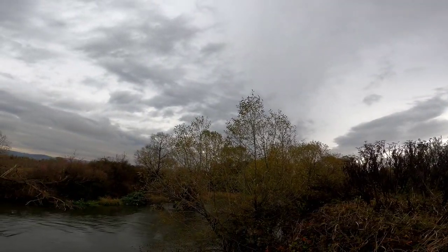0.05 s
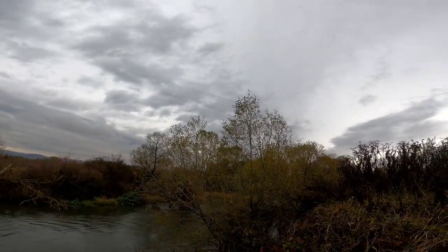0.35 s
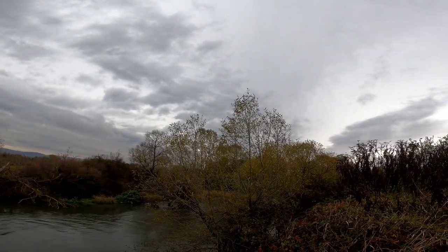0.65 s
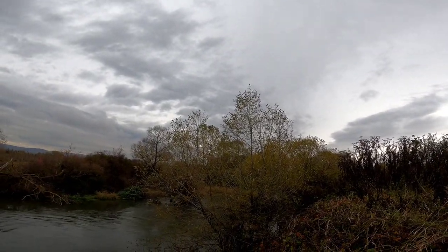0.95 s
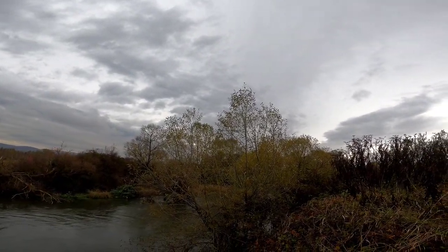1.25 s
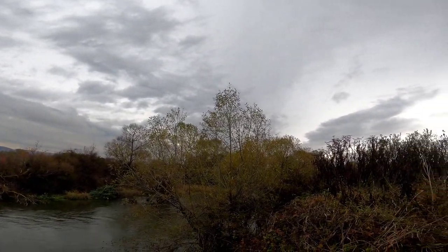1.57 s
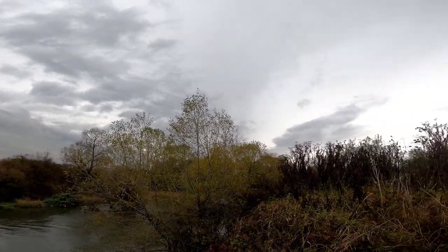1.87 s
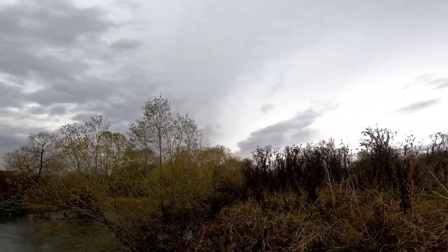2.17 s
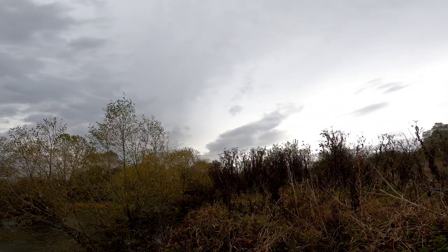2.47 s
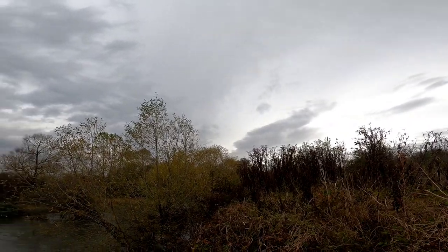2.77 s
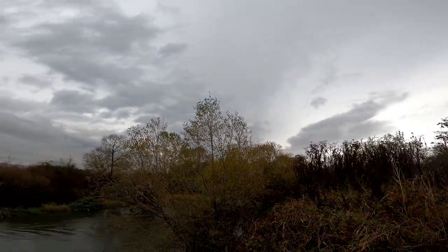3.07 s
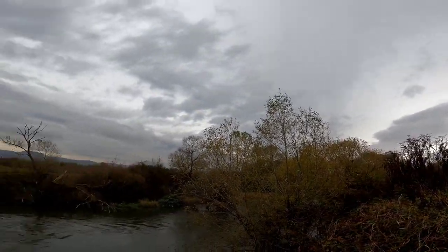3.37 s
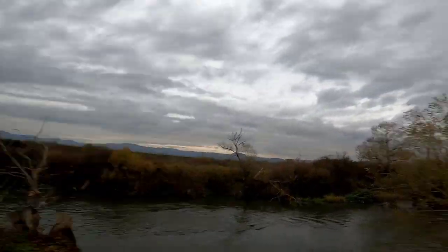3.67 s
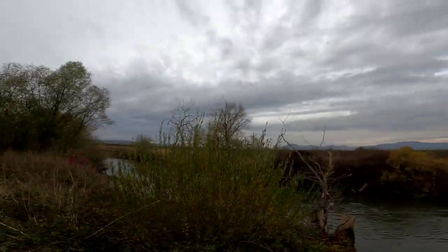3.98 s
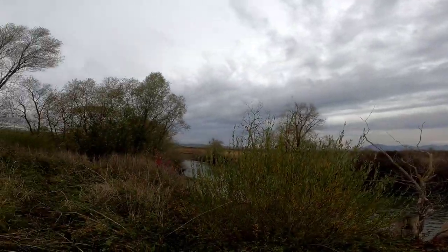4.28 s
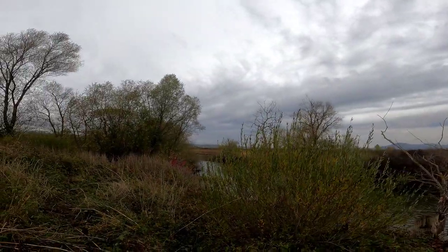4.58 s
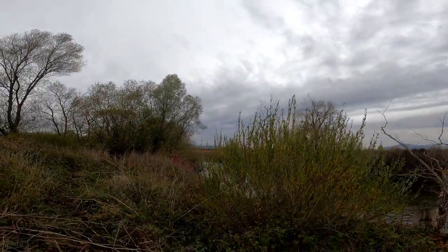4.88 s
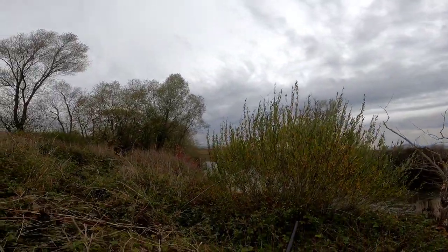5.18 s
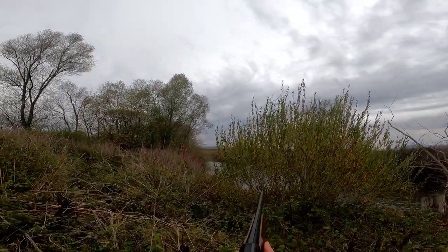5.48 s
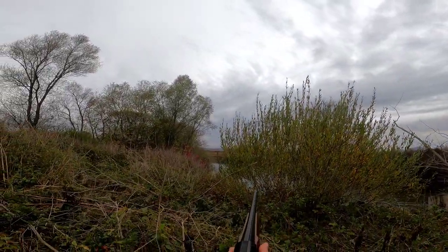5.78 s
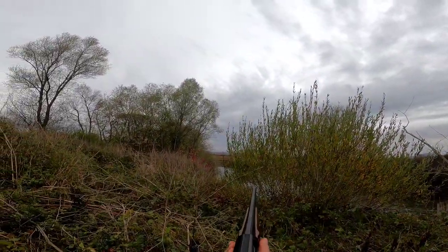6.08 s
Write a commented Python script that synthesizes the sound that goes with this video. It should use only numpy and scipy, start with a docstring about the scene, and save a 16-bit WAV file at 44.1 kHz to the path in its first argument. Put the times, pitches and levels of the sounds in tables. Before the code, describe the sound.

A river rushes softly under wind rumble and faint birds, then one loud, close shotgun blast echoes away, followed by metallic gun clicks and rustling.

```python
"""A shotgun fired close by on a river bank, heard from a body-worn microphone on a grey, breezy day.
The blast overloads the recorder, slaps back off the far bank and rolls away through the trees.
Under it the river splashes and bubbles, wind eddies rumble on the microphone and small birds twitter
in the bushes. Right at the microphone the wearer shifts in dry weeds and brings up a gun:
cloth rubs, stems snap, and a steel latch and catch click."""
import sys
import numpy as np
from scipy import signal
from scipy.fft import rfft, irfft
from scipy.io import wavfile

SR = 44100
rng = np.random.default_rng(int(sys.argv[2]) if len(sys.argv) > 2 else 0)


def to_wav(s):
    """Save 16-bit WAV."""
    ch = np.atleast_2d(s).T  # columns
    pcm = np.round(np.clip(ch, -1, 1) * 32767)  # PCM
    wavfile.write(sys.argv[1], SR, pcm.astype(np.int16))


N = 275184
TIME = np.arange(N) / SR
FREQS = np.maximum(np.arange(N // 2 + 1) * SR / N, 1)

# how alike the channels are for open air, gunshot and close sounds: (frequency [Hz], likeness [0-1])
AIR_LIKENESS = [(60, 0.1), (300, 0.73), (700, 0.85), (1400, 0.57), (3000, 0.31), (8000, 0.76)]
ROLL_LIKENESS = [(100, 0.96), (300, 1), (700, 0.86), (1400, 0.59), (3000, 0.4), (7000, 0.58)]
NEAR_LIKENESS = [(200, 0.99), (2000, 0.69), (10000, 0.47)]
# where the same three sit in the stereo image: (frequency [Hz], left over right [dB])
AIR_BALANCE = [(100, -0.5), (700, 0.5), (1300, 2), (4400, 0.5), (8000, 5), (15000, -1)]
ROLL_BALANCE = [(100, -0.5), (1300, 2.5), (4400, -1.5), (15000, 2.5)]
NEAR_BALANCE = [(200, 2), (1300, 17), (4400, 1.5), (15000, 8.5)]

# the river from the bank, fainter once the wearer turns away: (time [s], level [dB])
RIVER_LEVEL = [(0, -52.5), (1.9, -52), (2.5, -50.5), (2.7, -54), (5.6, -54.5), (6.1, -57.5)]
# the rush of the current: (frequency [Hz], level [dB])
RIVER_SPECTRUM = [(130, -4.5), (200, -1.5), (380, -3), (560, 1.5), (790, -4), (920, 3), (1300, -0.5),
                  (1900, -4.5), (2700, -10.5), (4500, -16), (7000, -21), (9700, -39), (12000, -71),
                  (15000, -67)]
# bubbles that stand out of the current: (time [s], start pitch [Hz], end pitch [Hz], level [dB])
PLOPS = [(0.192, 965, 2590, -52.5), (.388, 1150, 2620, -51), (2.581, 1330, 1930, -45.5),
         (6.021, 930, 1606, -51.5)]

# wind on the microphone, with an early buffet and a gust just before the shot: (time [s], level [dB])
WIND_LEVEL = [(0, -55), (.06, -34.5), (.12, -49.5), (.7, -47.5), (1.8, -42.5), (2.55, -41.5), (3.75, -45),
              (3.88, -36), (4.02, -35.5), (4.09, -48.5), (4.7, -44), (4.9, -37.5), (5.25, -42), (5.75, -42),
              (6.24, -40.5)]
# its rumble: (frequency [Hz], level [dB])
WIND_SPECTRUM = [(18, -20), (32, 1), (48, 1.5), (65, -5), (85, -13), (104, -15.5), (130, -23.5),
                 (200, -34.5), (300, -86)]
WIND_LIKENESS = [(20, .97), (60, .985)]  # (frequency [Hz], likeness [0-1])
WIND_BALANCE = [(20, .2), (100, .6)]  # (frequency [Hz], left over right [dB])

# notes of a song from deep in the bushes: (time [s], level [dB])
SONG_NOTES = [(0.174, -58), (0.227, -51.5), (0.302, -51.5), (0.371, -48), (0.442, -53.5), (0.515, -52),
              (.604, -54.5), (0.712, -63)]
# a bird's faint trills: (time [s], level [dB])
TRILLS = [(0.515, -59), (2.813, -63.5)]
# the tones of one trill note: (pitch [Hz], level [dB], roughness [share of pitch])
TRILL_TONES = [(3850, -1.5, .036), (4450, -3, .036), (5500, -6, .08)]
# high buzzing calls, farther off: (time [s], pitch [Hz], level [dB])
BUZZES = [(.615, 8300, -60.5), (1.33, 7550, -61), (1.945, 7950, -61.5), (2.875, 7600, -56.5),
          (3.597, 7400, -53.5)]
# nearby whistles:
# (time [s], length [s], start pitch [Hz], end pitch [Hz], level [dB], roughness [share of pitch])
WHISTLES = [(1.569, 0.044, 5570, 7400, -57, 0.07), (1.607, 0.049, 4290, 4300, -55, 0.019),
            (2.515, 0.05, 8500, 6750, -61, .013), (2.647, 0.035, 8100, 6100, -56.5, .011),
            (3.107, 0.03, 8950, 8200, -61.5, .013)]
# short harsh scolds nearby: (time [s], length [s], level [dB])
SCOLDS = [(2.765, 0.028, -56), (3.7, 0.018, -49.5), (3.74, 0.019, -46.5), (3.781, 0.016, -53.5)]

# dry stalks snapping close by: (time [s], level [dB], centre [Hz])
SNAPS = [(0.509, -46, 9000), (0.9742, -44, 9000), (1.0044, -50, 11000), (1.222, -48, 4000),
         (1.303, -43, 7560), (1.742, -42.5, 3820), (1.8498, -46, 4000), (1.9077, -47.5, 5000),
         (2.9464, -44, 7500), (3.3952, -46.5, 4550), (4.072, -48, 3500), (4.3628, -30.5, 8100),
         (4.385, -29, 3980), (4.4555, -32, 3570), (5.632, -41, 6200), (5.677, -36, 5970),
         (5.809, -38, 5700), (6.007, -42, 6500), (6.1732, -38.5, 4870)]
# light knocks of the wearer's gear: (time [s], level [dB], centre [Hz], left over right [dB])
GEAR_KNOCKS = [(4.9545, -26.5, 970, 1), (4.9681, -23.5, 12000, 13), (5.427, -34.5, 960, 0),
               (5.5415, -35, 6550, 7)]
# resonances of stalks and gear: (frequency [Hz], level [dB], t60 [s])
CLICK_MODES = [(957, -3, 0.033), (1220, -7.5, 0.006), (1490, 0, 0.0063), (2460, 3, 0.0039),
               (3470, 2, 0.0048), (5040, 2, 0.0052), (6500, 7, 0.0017), (7400, 6, 0.002),
               (9540, -1, 0.0038), (12300, 5, 0.0014)]
# dead stems crunching under the boots: (time [s], level [dB], half length [s])
CRUNCHES = [(1.0, -56, 0.024), (1.36, -59, 0.16), (1.76, -61.5, 0.39), (3.42, -61, 0.22),
            (4.06, -64, 0.039), (5.7, -54, 0.55)]
# clothes rubbing by the microphone, legs sweeping through weeds: (time [s], level [dB], half length [s])
CLOTH_SCUFFS = [(1.74, -51, 0.018), (2.35, -56.5, 0.43), (2.966, -51.5, 0.058), (3.17, -54, 0.18),
                (3.626, -51, 0.042), (3.716, -47.5, 0.048), (5.21, -39, 0.037), (5.33, -41.5, 0.04),
                (5.542, -47, 0.042), (5.785, -51.5, 0.11), (6.192, -51, 0.042)]
WEED_SWEEPS = [(4.818, -42, 0.027), (4.92, -50.5, 0.2), (5.26, -55, 0.11), (5.525, -52, 0.014),
               (5.68, -57, 0.28), (5.683, -46, 0.028), (5.95, -61, 0.35)]
# dull cloth and crisp weeds: (frequency [Hz], level [dB])
CLOTH_SPECTRUM = [(120, -9), (220, -6.5), (290, 6.5), (400, -7.5), (700, -14), (1000, -17), (1600, -9),
                  (2500, -22.5), (6000, -29), (14000, -70)]
WEED_SPECTRUM = [(530, -19), (900, -5), (1230, -8.5), (2090, -4.5), (3910, -2), (4980, -1), (7580, -2),
                 (11700, -8.5), (14000, -7), (16000, -45)]

# the crack of the shot at close range: (frequency [Hz], level [dB])
CRACK_SPECTRUM = [(400, 19.5), (1200, 22), (1700, -17), (2000, 21.5), (2550, 0), (3000, -21),
                  (5000, -10.5), (9000, -23), (13000, -50)]
# plants that scatter the blast (weeds at hand, far bank, tree line):
# (delay [s], rise [s], fade [dB/s], body level [dB], hiss level [dB])
STANDS = [(.003, 0.0014, 300, -35, -42.5), (0.079, 0.053, 28, -32.5, -46), (0.236, .06, 160, -32, -39.5)]
# the blast as it returns from trunks and from leaves: (frequency [Hz], level [dB])
TRUNK_SPECTRUM = [(41, -27), (70, 0.5), (124, -1), (197, -6), (250, -5), (430, -5.5), (586, -3.5),
                  (740, -5.5), (1100, -3), (1680, -7), (3140, -15), (5000, -29), (6500, -26), (11000, -120)]
LEAF_SPECTRUM = [(1180, -33), (2000, -1.5), (3150, -12), (3430, -2.5), (4770, -3.5), (8890, -13),
                 (12000, -20.5), (15000, -16)]
# distinct echoes off banks and thickets: (time [s], level [dB], low edge [Hz], high edge [Hz])
ECHOES = [(4.21, -29.5, 447, 1300), (4.235, -18.5, 294, 750), (4.2372, -22.5, 1300, 4960),
          (4.244, -13.5, 550, 2180), (4.248, -29, 2430, 2900), (4.309, -24.5, 590, 800),
          (4.317, -35, 654, 1800), (4.468, -27, 660, 1060), (4.499, -37, 860, 1240),
          (4.540, -31, 344, 1700), (4.597, -34, 547, 1520), (4.619, -32, 253, 1110)]
# the dull noise each echo takes its band from: (frequency [Hz], level [dB])
ECHO_SPECTRUM = [(200, 15), (1000, 1), (3000, -13), (7000, -19.5)]

# the gun's latch trips and drops home; a small catch snaps over and rebounds:
# (time [s], level [dB], centre [Hz], left over right [dB])
LATCH_HITS = [(4.7278, -24.5, 7000, 4), (4.7291, -13, 1300, 5.5)]
CATCH_HITS = [(5.2325, -15, 3500, 7.5), (5.2342, -22.5, 8000, 5)]
# the steel ring of each: (frequency [Hz], level [dB], t60 [s])
LATCH_MODES = [(945, -3, 0.048), (1150, -6, .009), (1500, 4, 0.0041), (2480, 1, 0.0073), (3860, -8, .014),
               (4910, 6, .018), (6400, -3, 0.016), (7700, -15, .022), (8700, 3.5, 0.0058)]
CATCH_MODES = [(2470, -13, 0.0053), (3750, 2.5, 0.0034), (5670, 2.5, 0.0033), (7330, -6.5, .017),
               (8400, -18, 0.015)]

STEM_SIDE_DB = 4  # breaking stems sit left of the microphone


def amp(db):
    """Decibels to gain."""
    return 10 ** (np.asarray(db) / 20)


def unit_rms(x):
    """Scale to rms 1."""
    return x / np.sqrt(np.mean(x ** 2) + 1e-20)


def over_time(points):
    """A curve spread over all samples."""
    return np.interp(TIME, *np.transpose(points))


def over_hz(points):
    """A curve spread over all frequencies, on a log scale."""
    hz, value = np.transpose(points)
    return np.interp(np.log(FREQS), np.log(hz), value)


def pan(db):
    """Left and right gains, the left higher by db."""
    return amp(np.array([[db], [-db]]) / 2)


def cut(x, hz, kind, order=2):
    """Causal Butterworth filter."""
    return signal.sosfilt(signal.butter(order, hz, kind, fs=SR, output="sos"), x + 1e-18)


def white():
    """Two unrelated white noises."""
    return rng.standard_normal((2, N))


def drift(rate_hz):
    """A random wander of rms 1, mostly slower than rate_hz."""
    return unit_rms(irfft(rfft(rng.standard_normal(N)) / (1 + (FREQS / rate_hz) ** 2), N))


def grains(per_s, size_db):
    """Random tiny impacts of uneven size, as two unrelated streams."""
    sizes = amp(size_db * np.minimum(rng.exponential(1, (2, N)), 4))
    return unit_rms(sizes * white() * (rng.random(N) < per_s / SR))


def colour(source, spectrum, likeness, balance):
    """Two unrelated streams become one stereo sound with this spectrum; the middle has rms 1."""
    mid, side = rfft(source) * amp(over_hz(spectrum))
    alike = over_hz(likeness)
    sides = np.array([[1], [-1]])
    channels = np.sqrt(1 + alike) * mid + sides * np.sqrt(1 - alike) * side
    out = irfft(channels * amp(sides * over_hz(balance) / 2), N)
    return out / np.std(out.mean(axis=0))


def swells(rows):
    """Gain of rounded strokes that add in power."""
    strokes = (amp(level_db) * np.exp(-((TIME - s) / half) ** 2) for s, level_db, half in rows)
    return np.sqrt(sum(stroke ** 2 for stroke in strokes))


def glide(s, length, start_hz, end_hz, waver, bend=1.314, skew=1):
    """A short rounded sliding tone; more bend delays the slide, a skew under 1 brings the peak forward."""
    out = np.zeros(N)
    at = np.arange(*np.searchsorted(TIME, [s, s + length]))
    progress = (TIME[at] - s) / length
    hz = (start_hz + (end_hz - start_hz) * progress ** bend) * (1 + waver[at])
    out[at] = np.sin(np.pi * progress ** skew) * np.sin(2 * np.pi * np.cumsum(hz) / SR)
    return out


def ring(hits, hz, t60):
    """A unit click sets a sine of height 1 ringing."""
    decay, step = amp(-60 / (t60 * SR)), 2 * np.pi * hz / SR
    return signal.lfilter([0, np.sin(step)], [1, -2 * decay * np.cos(step), decay ** 2], hits + 1e-18)


def strike(contacts, modes, db_per_octave):
    """Each contact rings the modes nearest its own centre most; yields one sound per mode."""
    for hz, mode_db, t60 in modes:
        hits = np.zeros((2, N))
        for s, level_db, centre_hz, side_db in contacts:
            falloff_db = db_per_octave * abs(np.log2(hz / centre_hz))
            hits[:, int(s * SR)] += amp(level_db + mode_db - falloff_db) * pan(side_db)[:, 0]
        yield ring(hits, hz, t60)


def thicket(x, t60, wet_db):
    """Add the diffuse reflections of nearby stems and ground."""
    age = TIME[:SR // 2]
    tail = rng.standard_normal((2, len(age))) * amp(-60 * age / t60)
    tail /= np.sqrt(np.sum(tail ** 2, axis=1, keepdims=True))
    return x + amp(wet_db) * signal.fftconvolve(x, tail, axes=1)[:, :N]


def river():
    """The current from the bank: a rush of countless tiny splashes with bubbles in it."""
    splashes = white() + grains(per_s=2500, size_db=2.5)
    rush = colour(splashes, RIVER_SPECTRUM, AIR_LIKENESS, AIR_BALANCE) * amp(.86 * drift(36))
    return amp(over_time(RIVER_LEVEL)) * (rush + babble()) + plops() * pan(2.1)


def babble(per_s=28, centre_hz=1054.5, spread_octaves=.5, longest_s=.027):
    """Bubbles all over the current, each a brief rising note; the smaller, the higher and fainter."""
    out, waver = np.zeros((2, N)), .025 * drift(210)
    count = int(per_s * N / SR)
    starts = rng.random(count) * N / SR
    for s, (pitch, strength, side) in zip(starts, rng.standard_normal((count, 3))):
        hz = centre_hz * 2 ** (spread_octaves * pitch)
        size = min(centre_hz / hz, 1)
        life = slice(int(s * SR), int((s + longest_s) * SR))
        note = glide(s, longest_s * size, hz, 1.143 * hz, waver)[life]
        out[:, life] += size * amp(-3 + 1.9 * strength) * pan(3 * side) * note
    return out


def plops(length_s=.047):
    """Single bubbles ring unsteadily, higher and higher as they near the surface."""
    waver = .089 * drift(350)
    return sum(amp(level_db) * glide(s, length_s, start_hz, end_hz, waver, bend=1.2)
               for s, start_hz, end_hz, level_db in PLOPS)


def wind():
    """Eddies at the microphone make a lumpy rumble, nearly the same at both ports."""
    eddies = colour(white(), WIND_SPECTRUM, WIND_LIKENESS, WIND_BALANCE)
    return amp(over_time(WIND_LEVEL) + 1.1 * drift(1.8) + 1.8 * drift(7.4)) * eddies


def birds(scold_hz=5700, warble_hz=185):
    """Thin gliding calls roughened by fast flutter, some near the microphone, some deep in the bushes."""
    flutter = drift(720)
    buzzes = sum(amp(level_db) * glide(s, .056, hz, hz, .055 * flutter) for s, hz, level_db in BUZZES)
    whistles = sum(amp(level_db) * glide(s, length, start_hz, end_hz, rough * flutter)
                   for s, length, start_hz, end_hz, level_db, rough in WHISTLES)
    warble = .16 * np.sin(2 * np.pi * warble_hz * TIME) + .12 * flutter
    scolds = sum(amp(level_db) * glide(s, length, scold_hz, .9 * scold_hz, warble)
                 for s, length, level_db in SCOLDS)
    far = thicket((song(flutter) + buzzes) * pan(4.4), t60=.55, wet_db=-.5)
    near = thicket((scolds + whistles + trills(flutter)) * pan(3), t60=.3, wet_db=-7)
    return far + near


def song(flutter, crest_s=.3, crest_hz=7950, sag_hz_per_s=3600):
    """A small bird's grainy run of down-slurred notes that crests, then sinks and slows."""
    out = np.zeros(N)
    for s, level_db in SONG_NOTES:
        past_crest = s - crest_s
        hz = crest_hz - sag_hz_per_s * abs(past_crest)
        length = .035 + .06 * past_crest
        out += amp(level_db) * glide(s, length, hz, .7 * hz, .017 * flutter, bend=1.9, skew=.75)
    return out * unit_rms(amp(2.5 * drift(220)))


def trills(flutter, count=8, gap_s=.044, slowing_s=.001, swell_db=.45):
    """A bird's fast raspy notes, three tones at once and no two notes alike, slowing and swelling."""
    out = np.zeros(N)
    for start, level_db in TRILLS:
        for k, (pitch, strength) in enumerate(rng.standard_normal((count, 2))):
            s = start + gap_s * k + slowing_s * k ** 2
            note_db = level_db + swell_db * k + strength
            for hz, tone_db, rough in TRILL_TONES:
                waver = .018 * pitch + rough * flutter
                out += amp(note_db + tone_db) * glide(s, .027, hz, .97 * hz, waver)
    return out


def snaps_and_knocks():
    """Stalks snap and gear knocks close by, heavy parts low and thin ones high; stems scatter the sound."""
    contacts = list(GEAR_KNOCKS) + [(s, level_db, hz, STEM_SIDE_DB) for s, level_db, hz in SNAPS]
    modes = strike(contacts, CLICK_MODES, db_per_octave=9.5)
    rung = sum(mode * (-1) ** k for k, mode in enumerate(modes))
    return cut(thicket(rung, t60=.041, wet_db=-6.5), 630, "high", order=6)


def crunching_stems(breaks_per_s=190, ring_cycles=26):
    """Dead stems break underfoot in clumps of tiny ticks, each ringing briefly at its own stem's pitch."""
    pitches_hz = np.geomspace(3560, 10800, 14)
    breaks = (rng.random(N) < breaks_per_s / SR) * rng.standard_normal(N) * swells(CRUNCHES)
    stem = rng.integers(0, len(pitches_hz), N)
    ticks = sum(ring(breaks * (stem == k), hz, ring_cycles / hz) for k, hz in enumerate(pitches_hz))
    return thicket(amp(4) * ticks * pan(STEM_SIDE_DB), t60=.02, wet_db=-2)


def footfall(s=1.375):
    """A boot settles dully into soft ground below the microphone."""
    thud = unit_rms(cut(white()[0], [140, 260], "band"))
    return amp(-41.5) * thud * np.exp(-((TIME - s) / .012) ** 2)


def rustle(stir_db=-70):
    """Cloth rubs by the microphone; dry weeds crackle against the legs, over a faint constant stir."""
    crackle = colour(grains(per_s=16000, size_db=3), WEED_SPECTRUM, NEAR_LIKENESS, NEAR_BALANCE)
    brushing = np.hypot(amp(stir_db), swells(WEED_SWEEPS))
    weeds = crackle * brushing * amp(2.25 * drift(50))
    cloth = swells(CLOTH_SCUFFS) * colour(white(), CLOTH_SPECTRUM, NEAR_LIKENESS, AIR_BALANCE)
    return weeds + cloth


def shotgun(shot_s):
    """A close bark and the muzzle blast behind it, then a slap and a low boom back from the far bank."""
    age = np.maximum(TIME - shot_s, 0)
    rise = age / .00049
    pulse = rise * np.exp(1 - rise)
    bark = amp(-2.5) * np.sin(2 * np.pi * 1040 * age) * pulse
    bite = amp(-14) * np.sin(2 * np.pi * 2300 * age) * pulse
    pressure = blast_wave(shot_s + .0014, push_s=.0023)
    blast = amp(-1) * cut(cut(pressure, 35, "high"), 1240, "low")
    front = leading_ring(bark + blast) * pan(.84)
    grit = colour(white(), CRACK_SPECTRUM, NEAR_LIKENESS, ROLL_BALANCE)
    crack = grit * amp(-13) * (age > 0) * np.exp(-age / .0049)
    slap = -amp(-2) * cut(blast_wave(4.2429, push_s=.0011), [300, 2800], "band")
    boom = -amp(1.5) * cut(blast_wave(4.241, push_s=.0096), [48, 115], "band")
    return front + bite + crack + slap + boom


def blast_wave(start, push_s):
    """A sudden overpressure that falls through zero into a longer suction."""
    age = np.maximum(TIME - start, 0) / push_s
    return (TIME >= start) * (1 - age) * np.exp(-age)


def leading_ring(x, edge_hz=890, top_hz=1460):
    """A band just above a steep edge is lifted and runs slightly ahead, so a faint ring near 1 kHz leads into
    each front."""
    ahead = cut(x, top_hz, "low", order=4)
    steep = signal.ellip(6, .3, 38, edge_hz, "high", fs=SR, output="sos")
    return x + amp(-1) * signal.sosfilt(steep, ahead[::-1])[::-1]


def roll(shot_s):
    """Trunks scatter the body of the blast, leaves its treble; the ground carries a short rumble."""
    body_power = hiss_power = 0
    for delay, rise, fade_db_per_s, body_db, hiss_db in STANDS:
        age = TIME - shot_s - delay
        shape = np.exp(np.minimum(age, 0) / rise) * amp(-fade_db_per_s * np.maximum(age, 0))
        body_power += (amp(body_db) * shape) ** 2
        hiss_power += (amp(hiss_db) * shape) ** 2
    body = colour(grains(per_s=5900, size_db=0), TRUNK_SPECTRUM, ROLL_LIKENESS, ROLL_BALANCE)
    body *= np.sqrt(body_power) * amp(.24 * drift(48))
    hiss = colour(grains(per_s=5000, size_db=-.5), LEAF_SPECTRUM, ROLL_LIKENESS, ROLL_BALANCE)
    hiss *= np.sqrt(hiss_power) * amp(drift(60))
    rumble_age = np.maximum(TIME - 4.255, 0)
    rumble = unit_rms(cut(white()[0], [95, 150], "band"))
    rumble *= amp(-21) * np.tanh(rumble_age / .00358) * np.exp(-rumble_age / .0307)
    return (body + hiss) * (TIME > shot_s) + rumble


def echoes(shot_s):
    """Each bank returns a tight cluster of reflections that swells fast and fades slower."""
    out, after = np.zeros((2, N)), slice(int(shot_s * SR), N)
    cluster = colour(white(), ECHO_SPECTRUM, ROLL_LIKENESS, ROLL_BALANCE)[:, after]
    for s, level_db, low_hz, high_hz in ECHOES:
        smear_s = .0055 + .01 * (s - shot_s)  # the farther it travels, the more smeared it returns
        age = (TIME[after] - s) / smear_s
        band = unit_rms(cut(cluster, [low_hz, high_hz], "band"))
        out[:, after] += band * amp(level_db) * np.exp(-np.maximum(age, -2 * age))
    return out


def latch_and_catch():
    """Gun parts right by the microphone: sharp, almost dry, each with its own steel ring."""
    latch = cut(sum(strike(LATCH_HITS, LATCH_MODES, db_per_octave=8)), 1090, "high", order=3)
    catch = cut(sum(strike(CATCH_HITS, CATCH_MODES, db_per_octave=12.5)), 1200, "high")
    return thicket(latch + catch, t60=.05, wet_db=-9)


def scene():
    """Everything that reaches the microphone on the bank."""
    shot_s = 4.16763
    gunshot = shotgun(shot_s) + echoes(shot_s) + roll(shot_s)
    wearer = rustle() + crunching_stems() + footfall() + snaps_and_knocks() + latch_and_catch()
    return river() + wind() + birds() + gunshot + wearer


def record(dry):
    """The blast overloads the recorder; the top falls away softly and is then cut."""
    clipped = np.clip(dry, -.93, .93)
    soft = cut(clipped, 10130, "low", order=4)
    return signal.sosfilt(signal.ellip(10, .1, 80, 15700, fs=SR, output="sos"), soft)


dry = scene()
out = record(dry)
to_wav(out)
```